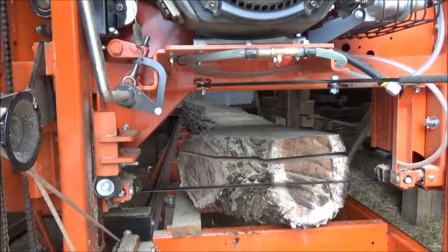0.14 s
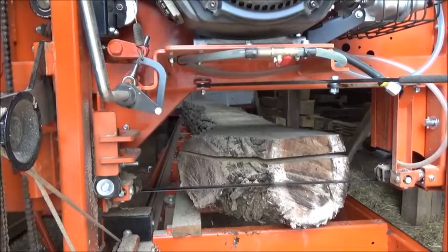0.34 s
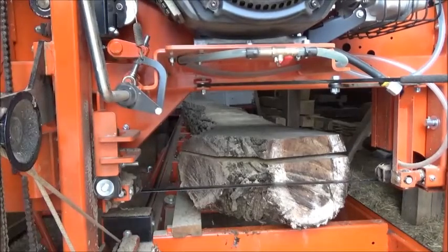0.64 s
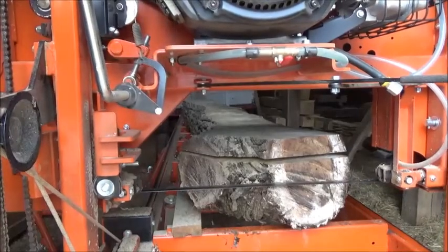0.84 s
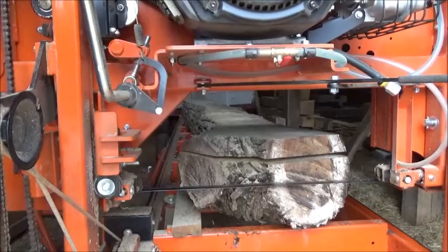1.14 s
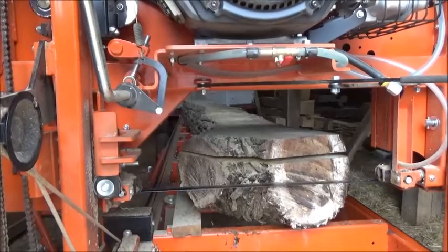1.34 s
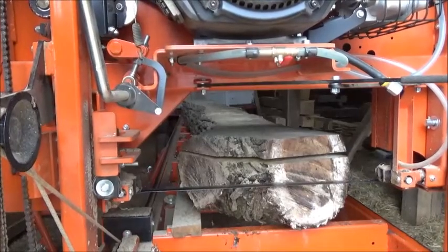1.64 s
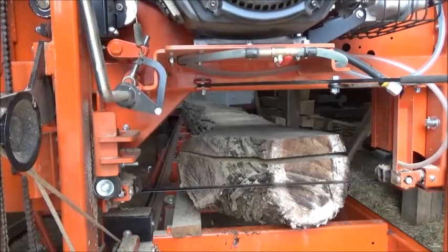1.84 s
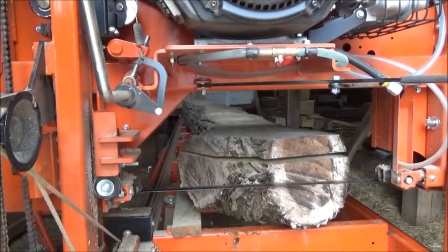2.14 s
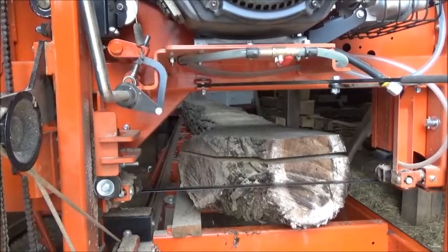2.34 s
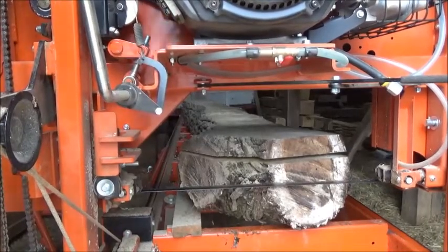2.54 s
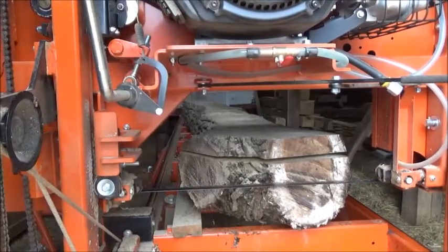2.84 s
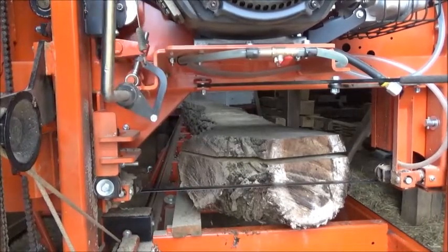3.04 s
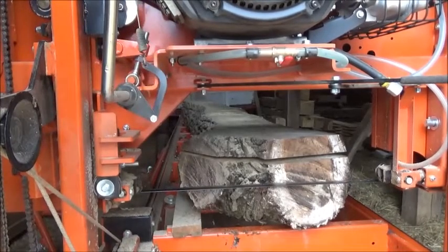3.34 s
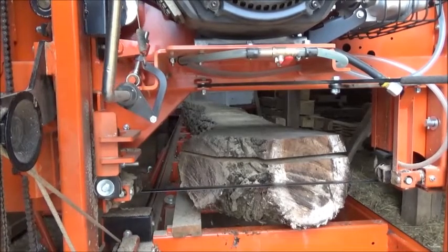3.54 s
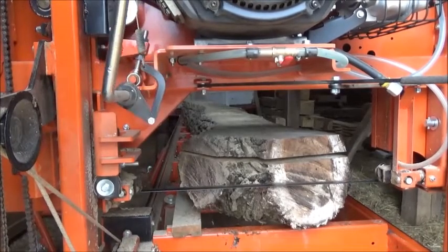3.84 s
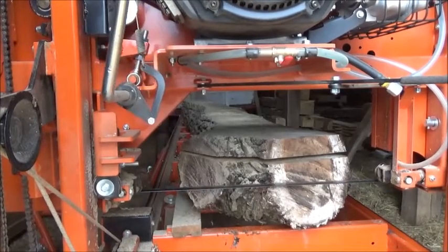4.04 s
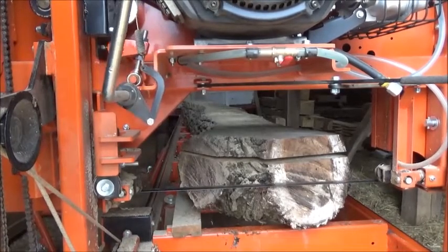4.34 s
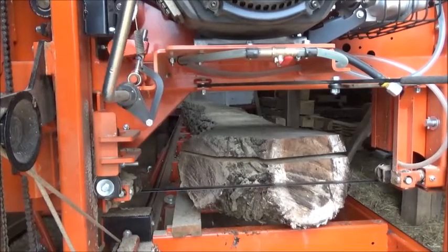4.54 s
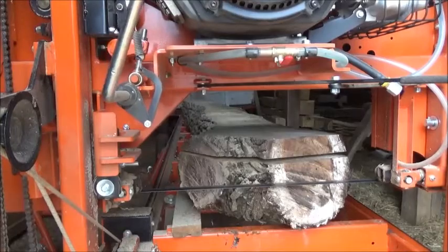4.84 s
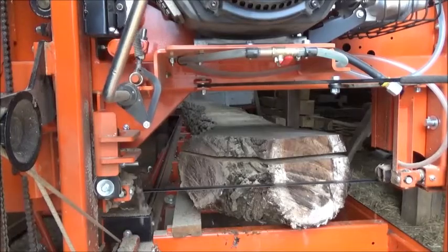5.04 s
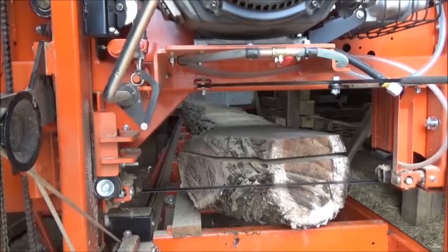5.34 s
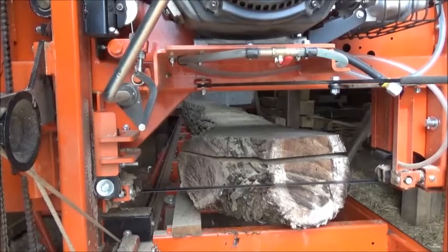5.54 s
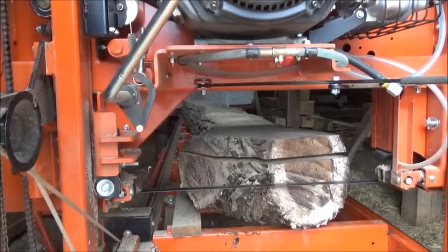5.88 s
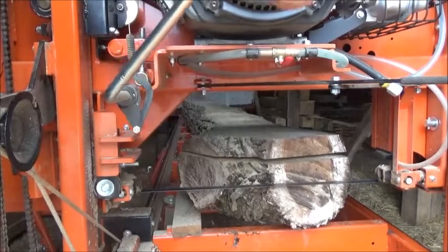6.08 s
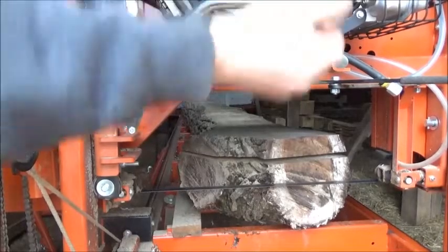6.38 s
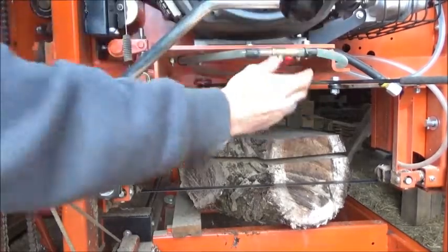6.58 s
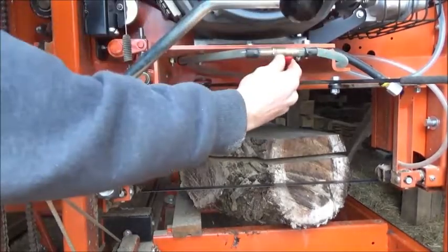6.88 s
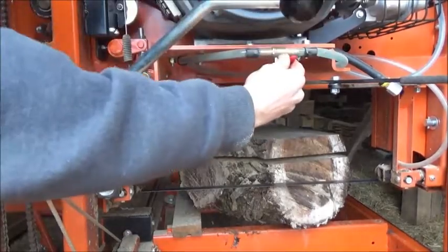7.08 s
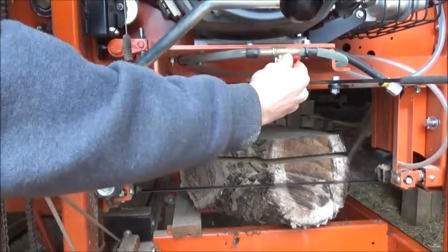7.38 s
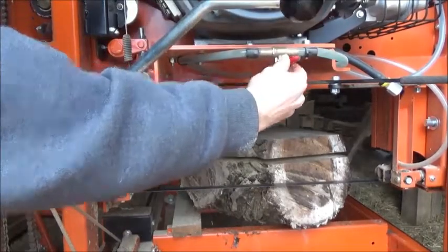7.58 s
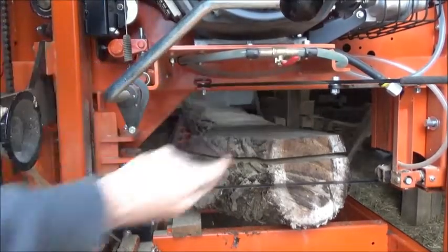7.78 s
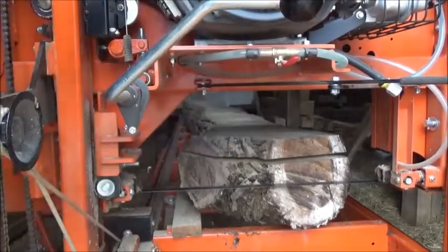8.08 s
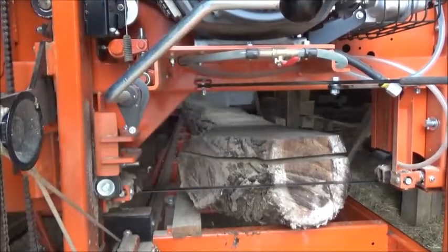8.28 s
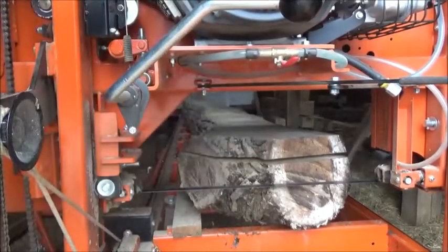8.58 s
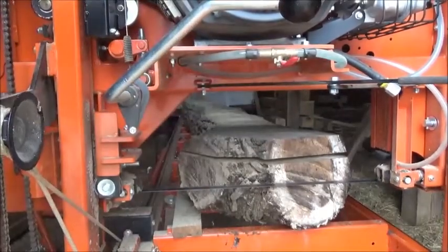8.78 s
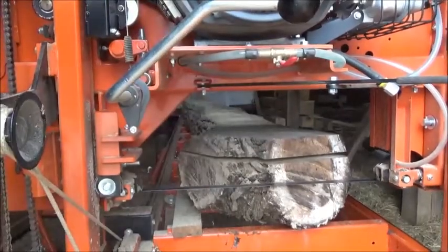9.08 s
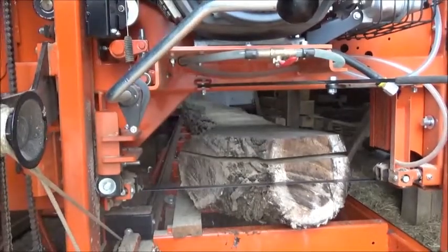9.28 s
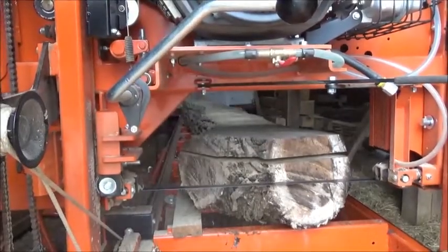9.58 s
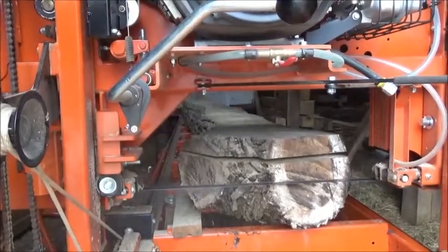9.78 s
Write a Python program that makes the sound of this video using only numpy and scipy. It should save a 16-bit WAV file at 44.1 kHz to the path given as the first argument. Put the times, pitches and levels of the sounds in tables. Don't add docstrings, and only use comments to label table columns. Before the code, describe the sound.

Lumpy twin-cylinder idle, sharp exhaust puffs and belt squeals at throttle-up, then a saw blade's thin whine and hiss take over the sinking engine.

```python
import sys
import numpy as np
from scipy import signal
from scipy.fft import rfft, irfft, next_fast_len
from scipy.io import wavfile
from scipy.ndimage import uniform_filter1d

SR = 44100
rng = np.random.default_rng(int(sys.argv[2]) if len(sys.argv) > 2 else 0)


def pcm_store(signal):
    levels = np.round(np.clip(np.atleast_2d(signal), -1, 1) * 32767)
    wavfile.write(sys.argv[1], SR, levels.astype(np.int16).T)


def volts_from_db(level):
    exponent = np.asarray(level, float) / 20
    return 10 ** exponent


N = 437472
T = np.arange(N) / SR
FREQ = np.fft.rfftfreq(next_fast_len(N), 1 / SR) + 1e-3


def curve(table, column=1):
    return np.interp(T, [row[0] for row in table], [row[column] for row in table])


def walk(rate_hz):
    hold = int(SR / rate_hz)
    steps = np.repeat(rng.standard_normal(N // hold + 1), hold)
    return 1.13 * uniform_filter1d(uniform_filter1d(steps, hold), hold)[:N]


def swell(start_s, attack_s, hold_s, release_s):
    return np.interp(T, np.cumsum([start_s, attack_s, hold_s, release_s]), [0, 1, 1, 0])


def jolt(start_s, db, fade_db_per_s):
    return (T > start_s) * volts_from_db(db - fade_db_per_s * np.maximum(T - start_s, 0))


def bump(centre_s, width_s):
    return np.exp(-((T - centre_s) / width_s) ** 2)


def resonance(hz, centre_hz, width_hz):
    return 1 / (1 + (2 * (hz - centre_hz) / width_hz) ** 2)


def band_rms(x, lo_hz, hi_hz):
    mid = x.mean(axis=0)
    power = np.abs(rfft(mid, next_fast_len(N))) ** 2
    inside = power[(FREQ > lo_hz) & (FREQ < hi_hz)].sum() / power.sum()
    return x / np.sqrt(inside * np.mean(mid ** 2))


def placed(x, pan_db):
    return x * volts_from_db(np.array([[pan_db / 2], [-pan_db / 2]]))


def wavering(hz, waver, rate_hz, rough_db):
    strength = volts_from_db(rough_db * walk(rate_hz))
    return strength * np.sin(2 * np.pi * np.cumsum(hz * (1 + waver * walk(rate_hz))) / SR)


def rush(gate, gated_hz, spectrum, rings, wide, swell_db, flicker_db):
    hz, db = np.transpose(spectrum)
    gain_db = np.interp(np.log(FREQ), np.log(hz), db)
    for centre_hz, width_hz, ring_db in rings:
        gain_db = gain_db + ring_db * resonance(FREQ, centre_hz, width_hz)
    mid, side = rng.standard_normal((2, N))
    both = rfft([mid + wide * side, mid - wide * side], next_fast_len(N)) * volts_from_db(gain_db)
    out, common = 0, walk(4.31)
    for octave in range(9):
        distance = np.clip(np.log2(FREQ / 44) - octave, -1 * (octave > 0), 1)
        band = irfft(both * np.cos(np.pi / 2 * distance) ** 2)[:, :N]
        gate_share = np.clip(1 - abs(np.log2(44 * 2 ** octave / gated_hz)) / 4, 0, 1)
        out = out + band * volts_from_db(swell_db * common + flicker_db * walk(18)) * gate ** gate_share
    return out


def firings(cycle, decay_cycles, scatter_db):
    out = 0
    for lag_cycles in (0, .44):
        turn = cycle - lag_cycles + 1
        strength = volts_from_db(scatter_db * rng.standard_normal(N // 500))[turn.astype(int)]
        out = out + strength * np.exp(-(turn % 1) / decay_cycles)
    return out


def tones(cycle, orders, second, muffler, drag, wander_db, lag, shell_db, load_db):
    second_at, shell_hz, shell_width_hz = .384, 166, 22
    centre_hz, width_hz, chambers = muffler
    strength = uniform_filter1d(rng.standard_normal(N // 500)[(2 * cycle).astype(int)], size=400)
    cycle_hz = np.gradient(cycle) * SR
    out = 0
    for k, db in orders:
        angle = 2 * np.pi * k * cycle
        angle = angle + np.angle(1 + second * np.exp(-2j * np.pi * k * second_at))
        angle = angle - chambers * np.arctan((k * cycle_hz - centre_hz) / width_hz)
        angle = angle - drag * k ** 2 + 0.15 * walk(8.1)
        ports = lag * np.clip(k, 9, 18) * np.array([[-.5], [.5]])
        level_db = db + load_db * (k in (7, 8, 10, 11)) + wander_db * walk(7.2)
        level_db = level_db + shell_db * resonance(k * cycle_hz, shell_hz, shell_width_hz)
        out = out + volts_from_db(level_db) * np.sin(angle + ports)
    return out * volts_from_db(1.5 * wander_db * strength)


# [t/s, four-stroke cycle rate f/Hz]
SPEED = [(0, 15.7), (3.09, 15.6), (3.2, 16), (3.31, 18.7), (3.54, 27.6), (3.6, 29), (3.81, 27.6),
         (4.34, 27.7), (4.56, 27), (4.81, 24.8), (5.11, 25.4), (5.28, 22.4), (5.52, 27.1), (5.66, 29),
         (5.9, 30.9), (6.38, 29.7), (6.8, 29.4), (9.92, 29.4)]
# [t/s, speed share, level/dB]
MISFIRES = [
    (1.7, .08, 0),
    (2.2, .12, 0),
    (3.78, .035, -5),
    (6.12, .015, -3),
    (6.275, .07, -6),
]


def crank():
    misfire_s = .024
    hz = curve(SPEED) * (1 + .004 * walk(4))
    lurch = sum(share * (T - s) / misfire_s * np.exp(.5 - ((T - s) / misfire_s) ** 2 / 2)
                for s, share, _ in MISFIRES)
    weak = volts_from_db(sum(db * bump(s, misfire_s) for s, _, db in MISFIRES))
    idle_hz, open_hz = 16, 26.7
    opened = np.clip((hz - idle_hz) / (open_hz - idle_hz), 0, 1)
    return np.cumsum(hz * (1 + lurch)) / SR, opened, weak


# [multiple of cycle rate, level/dB]
IDLE_ORDERS = [(1, -32), (2, -32), (3, -23), (4, -29), (5, -13.5), (6, -15.5), (7, -18), (8, -6), (9, -14),
               (10, 1), (11, -14.5), (12, -6), (13, -11.5), (14, -9.5), (15, -11), (16, -8), (17, -38),
               (18, -19), (19, -21), (20, -16.5), (21, -23), (22, -17), (23, -35), (24, -9.5)]
OPEN_ORDERS = [(1, -33), (2, -15.5), (3, -21), (4, -19), (5, 0), (6, -1.5), (7, 0.5), (8, -5), (9, -16.5),
               (10, -15), (11, -8), (12, -13.5), (13, -11.5), (14, -21), (15, -17.5), (16, -8), (17, -27),
               (18, -12), (19, -17), (20, -9), (21, -34), (22, -21), (23, -31), (24, -8.5)]
# [multiple of cycle rate, level/dB]
IDLE_SHROUD = [(42, -12), (45, -16), (54, -21), (56, -21), (64, -17), (72, -14), (80, -14)]
OPEN_SHROUD = [(34, -17), (41, -14), (48, -9), (56, -14), (63, -17)]
# [f/Hz, level/dB per Hz]
MUFFLER = [(80, -30), (140, -5), (190, 0), (235, -5), (330, -18), (700, -40)]


def exhaust(cycle, idle, fast, weak, lull, stumble):
    load_db = -6 * swell(4.7, .1, .55, .2)
    slow = tones(cycle - .09, IDLE_ORDERS + IDLE_SHROUD, 1.15, (166, 18.5, 2.11), -.065, .8, .07, 0, 0)
    revved = tones(cycle, OPEN_ORDERS + OPEN_SHROUD, 0.8, (140, 10, 1), -.06, .6, .07, 4.5, load_db)
    steady = (idle * band_rms(slow, 100, 280) + fast * band_rms(revved, 100, 280)) * (1 - lull)
    boom = rush(.5 + 2 * firings(cycle, .2, 1.5), 180, MUFFLER, [], .3, 0, 0)
    return np.sqrt(1 - stumble) * weak * steady + np.sqrt(stumble) * volts_from_db(-9) * band_rms(boom, 100, 280)


# [f/Hz, level/dB per Hz]
IDLE_CLATTER = [(15, -52), (25, -19), (81, -15), (156, -8.5), (288, -12.5), (505, -14.5), (685, -15),
                (778, -15), (1140, -15), (1760, -14.5), (3590, -24), (7130, -28), (11000, -31),
                (14300, -66), (22000, -120)]
OPEN_CLATTER = [(15, -52), (25, -27), (85, -15.5), (131, -11.5), (182, -5), (300, -9), (819, -11.5),
                (907, -15), (1000, -10), (1670, -10), (2710, -15), (8970, -22), (11000, -27), (14300, -62),
                (22000, -120)]
# [f/Hz, width/Hz, level/dB]
IDLE_PANELS = [(276, 26, -6), (667, 32, 3.5), (700, 32, 4.5), (880, 33, 2.5), (1000, 20, 4.5),
               (1129, 22, 8), (1180, 14, 4.5), (1240, 34, 5.5), (1410, 45, 0), (1720, 27, 1),
               (1780, 21, 5.5), (1970, 14, 2), (2370, 20, 1.5), (2930, 100, 3.6), (7260, 1500, 4)]
OPEN_PANELS = [(258, 84, -3), (693, 75, 4), (905, 23, 7.5), (1522, 9.6, 8.5), (1670, 62, 2.5),
               (2370, 32, 5.5), (3110, 200, 3)]
# [f/Hz, level/dB]
RATTLES = [(4828, -16.5), (4130, -19.5)]


def clatter(cycle, idle, fast, lull, stumble):
    loose = rush(1 + .95 * firings(cycle, 0.15, 2.2), 1200, IDLE_CLATTER, IDLE_PANELS, 0.36, 0.35, 0.5)
    tight = rush(1 + 0.67 * firings(cycle, 0.13, 3.4), 2900, OPEN_CLATTER, OPEN_PANELS, 0.37, 0.3, 0.48)
    noise = idle * volts_from_db(-2.5) * band_rms(loose, 565, 1325) + fast * volts_from_db(-1.5) * band_rms(tight, 425, 1520)
    knock = uniform_filter1d(firings(cycle, .25, 1.8), size=200)
    rattle = sum(volts_from_db(db) * knock * wavering(hz, .008, 130, 2.2) for hz, db in RATTLES)
    surge_db = 1.5 * swell(3.54, 0.094, 0.059, 0.21)
    out = (1 - lull / 2) * noise + 2 * idle * (1 - stumble) * rattle
    return out * volts_from_db(-2 * stumble + surge_db)


# [t/s, level/dB]
ENGINE = [(0, -30.5), (3.0, -30.5), (3.15, -29.5), (3.6, -31.5), (4.3, -31.5), (4.55, -31), (4.76, -34.5),
          (4.83, -34), (5.1, -37.5), (5.25, -40), (5.45, -37.5), (5.7, -38.5), (6.3, -41.5), (6.5, -40.5),
          (9.92, -42)]


def engine():
    cycle, opened, weak = crank()
    idle, fast = np.cos(np.pi / 2 * opened), np.sin(np.pi / 2 * opened)
    lull_at_cycles, lull_width_cycles, lull_share = .7, .075, .6
    depth = lull_share * rng.uniform(.5, 1.5, N // 500)[cycle.astype(int)]
    lull = idle * depth * np.exp(-((cycle % 1 - lull_at_cycles) / lull_width_cycles) ** 2)
    stumble = .85 * swell(3.03, .04, .43, .07)
    level_db = curve(ENGINE)
    out = placed(exhaust(cycle, idle, fast, weak, lull, stumble) * volts_from_db(level_db - 1.9), -3.5)
    return out + placed(clatter(cycle, idle, fast, lull, stumble) * volts_from_db(level_db - 0.4), -2.06)


# [t/s, peak level/dB, f/Hz]
TICKS = [(0.1196, -32, 6150), (0.2468, -31, 6270), (0.4653, -26, 6880), (0.5906, -27, 7590),
         (1.0405, -27, 7480), (1.3319, -34, 6400), (1.5868, -35, 6930), (1.6501, -24, 6200),
         (1.8063, -24, 6900), (1.8721, -26, 6500), (1.9699, -28, 6230), (2.1625, -26, 6160),
         (2.4478, -23, 6570), (2.7402, -25, 6150), (2.8045, -27, 6380), (2.8669, -27, 7230)]


def ticks():
    tick_s, tick_db = .002, -6
    out = sum(volts_from_db(db + tick_db) * bump(s + tick_s, tick_s) * np.sin(2 * np.pi * hz * T)
              for s, db, hz in TICKS)
    return placed(out, -1.5)


# [t/s, level/dB, fade/dB per s]
GRABS = [
    (3.045, -45, 250),
    (3.076, -31.5, 70),
    (3.14, -30, 310),
    (3.194, -36, 21),
]
# [f/Hz, width/Hz, level/dB]
PULLEY = [(950, 200, 9), (1710, 180, 4.5), (1900, 91, 0), (2310, 390, 7.5)]


def belt_rub():
    rubber = [(500, -15), (1000, -6), (1500, -1), (2500, -2.5), (4500, -2), (9000, -15)]
    rub = rush(volts_from_db(2.5 * walk(70)), 2000, rubber, PULLEY, 0.41, .2, 1.2)
    grabs_end_s, slip_db, sag_db_per_s = 3.6, -30, 7
    grabs = np.max([jolt(*grab) for grab in GRABS], axis=0) * np.clip((grabs_end_s - T) / 0.066, 0, 1)
    slip = swell(4.55, 0.15, 0.442, 0.04) ** .5 * volts_from_db(slip_db - sag_db_per_s * np.maximum(T - 4.9, 0))
    return placed(band_rms(rub, 1500, 3600) * (grabs + slip) * volts_from_db(-4.0), -2.3)


# [t/s, peak level/dB]
PUFFS = [(3.0579, -29), (3.1837, -26), (3.2087, -28), (3.2455, -26.5), (3.269, -25.5), (3.3019, -26),
         (3.3214, -30), (3.352, -27), (3.3744, -33), (3.3992, -27), (3.4426, -25.5), (3.481, -26.5),
         (3.5194, -31), (3.5524, -32), (3.69, -31), (3.728, -37), (3.838, -32)]
# [t/s, peak level/dB]
CRACKS = [
    (3.184, -27),
    (3.3995, -11),
    (3.481, -22),
]


def puffs():
    decay_s, crack_s = 0.013, .00004
    gate = sum(jolt(s, db, 0) * np.exp(-np.maximum(T - s, 0) / decay_s) for s, db in PUFFS)
    jet = [(800, -9), (3000, -0.5), (6000, -1.5), (11000, 0.0)]
    gas = rush(0.91, 3000, jet, [(3200, 580, 8.8)], 0.45, 0, 0)
    snaps = sum(volts_from_db(db) * 2 * (T - s) / crack_s * bump(s, crack_s) for s, db in CRACKS)
    return placed(band_rms(gas, 4700, 11600) * gate * volts_from_db(-7.0) + snaps, -2.8)


# [t/s, f/Hz, peak level/dB]
THUDS = [(3.06, 170, -33), (3.115, 170, -24), (3.175, 185, -28), (3.228, 190, -23), (3.28, 200, -31),
         (3.32, 160, -33), (3.342, 215, -31), (3.375, 155, -29), (3.432, 190, -31), (3.474, 200, -28),
         (3.505, 150, -31), (3.535, 150, -29)]


def thuds():
    thud_s, overtone, overtone_db = .01, 2.15, -6.5
    out = 0
    for s, hz, db in THUDS:
        angle = 2 * np.pi * hz * (T - s)
        out = out + volts_from_db(db) * bump(s, thud_s) * (np.sin(angle) + volts_from_db(overtone_db) * np.sin(overtone * angle))
    return placed(out, -3.5)


# [t/s, length/s, f/Hz, level/dB]
SQUEALS = [(3.083, .02, 2280, -34), (3.145, 0.03, 1900, -33), (3.185, .006, 2800, -37),
           (3.2, 0.018, 3030, -30), (3.205, 0.011, 3450, -36), (3.342, .012, 2190, -32),
           (3.357, .008, 3200, -36), (3.535, .014, 2950, -38), (3.57, .008, 3400, -40),
           (3.62, .018, 1350, -30), (3.75, .012, 2870, -37), (3.227, 0.018, 2300, -31),
           (3.085, .02, 4100, -45), (3.386, 0.0079, 1590, -28), (3.482, .012, 3480, -36),
           (4.632, .025, 2320, -31.5), (4.678, .04, 2090, -38), (4.742, 0.03, 1900, -29),
           (4.69, .025, 920, -39), (4.793, .015, 950, -29), (4.838, .03, 920, -33), (4.83, .03, 1830, -39),
           (4.89, .025, 1750, -37), (4.71, 0.027, 1580, -41), (4.81, .03, 1780, -35),
           (5.117, .04, 1950, -39), (4.856, 0.037, 1670, -30), (4.92, 0.036, 1900, -30),
           (4.97, .025, 1900, -34), (4.995, .025, 2470, -34.5), (5.013, 0.022, 2260, -33),
           (5.07, 0.056, 1900, -37), (5.142, 0.017, 2370, -39), (5.16, 0.025, 2300, -37),
           (5.179, 0.019, 2550, -34)]


def squeals():
    out = 0
    for s, length_s, hz, db in SQUEALS:
        cluster = wavering(hz, .011, 150, 3.5)
        cluster = cluster + .6 * wavering(.94 * hz, .045, 200, 3) + .5 * wavering(1.07 * hz, .045, 200, 3)
        out = out + volts_from_db(db - 2.5) * bump(s, length_s) ** 2 * cluster
    return placed(out, -2.3)


# [start t/s, end t/s, f/Hz, level/dB,
# waver share]
WHINES = [(5.0, 10.5, 5590, -50, .009), (5.1, 10.5, 8250, -49, .006), (5.1, 10.5, 8620, -52, .006),
          (6.4, 7.9, 5600, -50, .011), (5.1, 8.4, 5910, -48.5, .005), (8.4, 10.5, 3655, -50.5, .002),
          (8.0, 10.5, 6790, -50.5, .006), (5.2, 6.8, 5010, -51, .005), (5.1, 10.5, 8390, -48, .005),
          (5.1, 10.5, 7935, -54, .003), (4.15, 4.9, 890, -44, .012), (5.2, 5.9, 3155, -51, .005),
          (5.3, 6.1, 3645, -53, .003), (5.9, 6.2, 4150, -57, .003), (8.9, 10.5, 4900, -55, .005),
          (8.6, 10.5, 6230, -54, .003), (5.3, 6.8, 6500, -57, .004), (6.5, 7.6, 5480, -55, .004)]


def whines():
    out = 0
    for start_s, end_s, hz, db, waver in WHINES:
        fade = np.clip(np.minimum(T - start_s, end_s - T) / .015, 0, 1)
        out = out + volts_from_db(db) * fade * wavering(hz, waver, 50, 3.5) * volts_from_db(1.5 * walk(22))
    return placed(out, -1.2)


# [f/Hz, level/dB per Hz]
BLADE_HISS = [(880, -15), (1500, -10.5), (2520, -13), (5240, -6), (5510, -6.5), (7560, -3.5), (8490, 1),
              (10600, 0), (11000, -3), (14300, -37), (22000, -120)]
# [f/Hz, width/Hz, level/dB]
BLADE_RINGS = [(3900, 250, -2.5), (4500, 350, -2.5), (5250, 220, -6), (5755, 100, -7), (6070, 80, -3),
               (3660, 30, 4), (4150, 66, 3), (4900, 50, 5), (5590, 60, 10), (5910, 35, 9), (6230, 40, 4),
               (6440, 100, 3), (6790, 80, 4), (7935, 60, 4), (8390, 90, 5), (8240, 80, 3.5),
               (8590, 90, 2.5), (8300, 500, 3), (8800, 200, 3), (9520, 110, 4), (10500, 200, 3)]
# [t/s, level/dB]
BITES = [
    (4.76, -35.5),
    (4.93, -38),
]


def blade():
    spin_up_s, running_s, start_db, running_db = 4.58, 5.22, -46, -31.5
    wheel_hz, wheel_db, bite_fade_db_per_s = 6.8, 0.57, 58
    wheel = signal.sawtooth(2 * np.pi * wheel_hz * T + 0.74 * walk(2), .2)
    grit = volts_from_db(walk(400) + wheel_db * wheel)
    hiss = rush(grit, 5100, [(700, -45)] + BLADE_HISS, BLADE_RINGS, 0.32, 0.44, 0.96)
    spin = volts_from_db(np.interp(T, [spin_up_s, running_s], [start_db, running_db]))
    bites = sum(jolt(s, db, bite_fade_db_per_s) for s, db in BITES)
    moving = np.clip((T - spin_up_s) / 0.28, 0, 1)
    return placed(band_rms(hiss, 7000, 11600) * np.maximum(spin, bites) * moving, -1.2)


# [t/s, f/Hz, level/dB]
SINGING = [(4.6, 2300, -48), (4.64, 2290, -38), (4.7, 1950, -38), (4.75, 1920, -37), (4.86, 1680, -38),
           (4.91, 1880, -35), (4.97, 1950, -38), (5.0, 2350, -34), (5.05, 1946, -38), (5.11, 1900, -40),
           (5.14, 2350, -38), (5.19, 2450, -42), (5.21, 2500, -60)]


def belt_song():
    hz = curve(SINGING)
    on = (T > SINGING[0][0]) * (T < SINGING[-1][0])
    voice = wavering(hz, .016, 170, 2.5) + .2 * wavering(2 * hz, .04, 260, 3)
    return placed(volts_from_db(curve(SINGING, column=2)) * on * voice, -2.3)


def band_slap():
    start_s, level_db, fade_db_per_s = 5.1, -37.5, 19
    spectrum = [(1500, -32), (2600, -6), (3200, -5), (4200, -7), (7000, -20)]
    slap = rush(0.94, 3000, spectrum, [(3230, 150, 4.7)], 0.57, 1.5, 1.3)
    level = swell(start_s, 0.2, 0.42, 0.69) * volts_from_db(level_db - fade_db_per_s * (T - start_s))
    return placed(band_rms(slap, 2000, 5000) * level, -1.2)


# [t/s, level/dB]
CHIRPS = [
    (6.185, -45),
    (6.315, -40),
]
# [f/Hz, level/dB]
ROLLER = [(4170, 0), (3670, -8)]


def chirps():
    out = 0
    for s, db in CHIRPS:
        pitches = sum(volts_from_db(db + under_db) * wavering(hz, 0.0025, 50, 2.9) for hz, under_db in ROLLER)
        out = out + swell(s, 0.018, .035, .015) * pitches
    return placed(out, -1.2)


def dry_band():
    start_s, rise_s, level_db = 6.7, 2.3, -38
    spectrum = [(4500, -39), (6000, -10), (7200, 1), (8200, -19), (10000, 6), (11000, 3)]
    dry_hiss = rush(1, 7000, spectrum, [(6230, 50, 5), (7300, 120, 4)], 0.18, 0.4, 1.1)
    rise = np.clip((T - start_s) / rise_s, 0, 1)
    return placed(band_rms(dry_hiss, 5000, 10800) * volts_from_db(level_db) * rise, -1.2)


def scene():
    motor = engine() + ticks() + puffs() + thuds()
    drive = belt_rub() + squeals() + belt_song()
    saw = whines() + blade() + band_slap() + chirps() + dry_band()
    return motor + drive + saw


def band_limit(x):
    return signal.sosfilt(signal.butter(12, 12050, fs=SR, output="sos"), x)


def record(dry):
    limit, top_hz = .42, 11020
    rounded = limit * np.tanh(dry / limit)
    top_cut = signal.ellip(12, .2, 60, top_hz, fs=SR, output="sos")
    return band_limit(signal.sosfilt(top_cut, rounded))


dry = scene()
out = record(dry)
pcm_store(out)
```